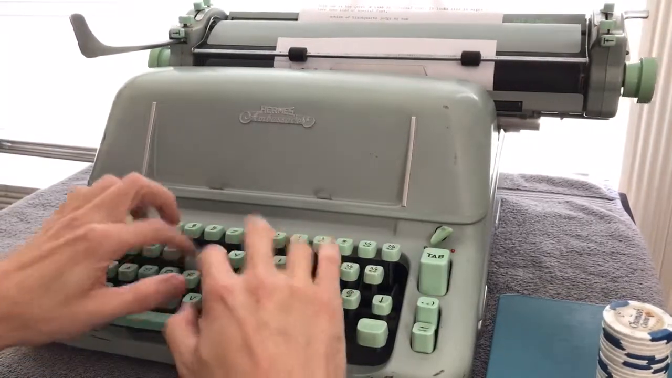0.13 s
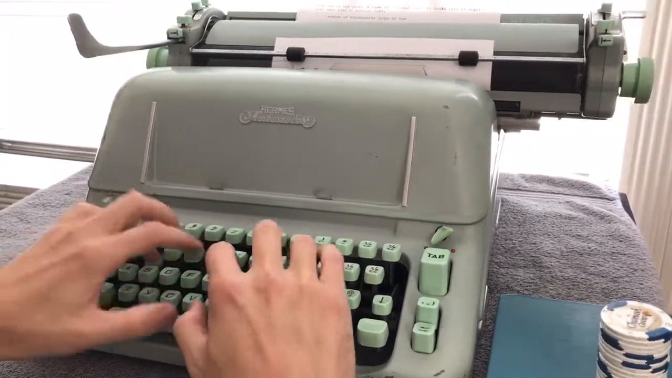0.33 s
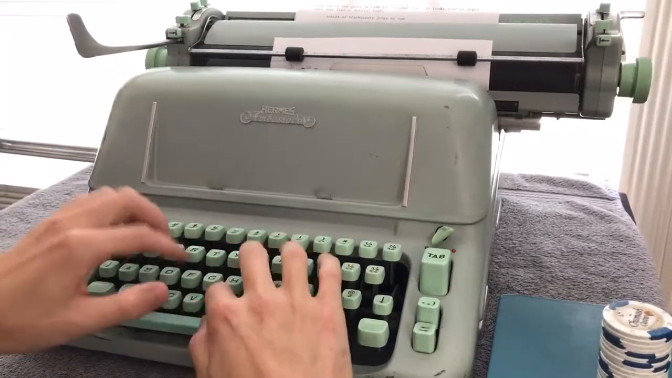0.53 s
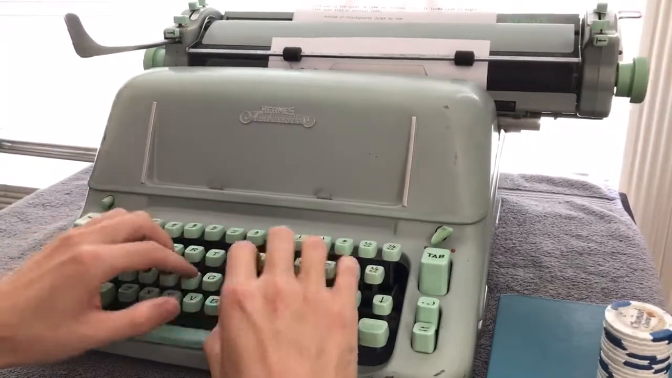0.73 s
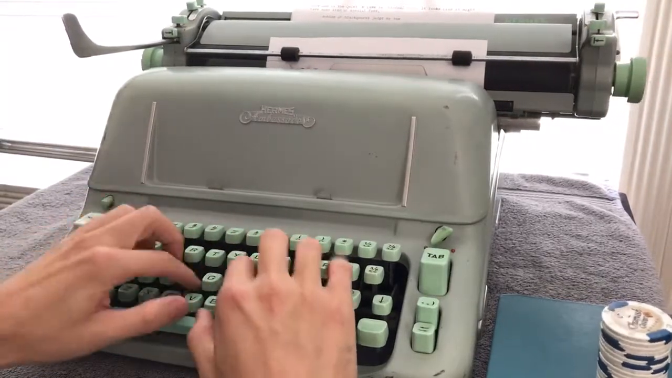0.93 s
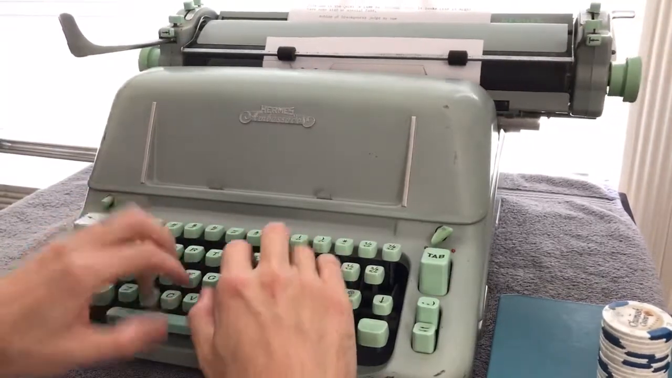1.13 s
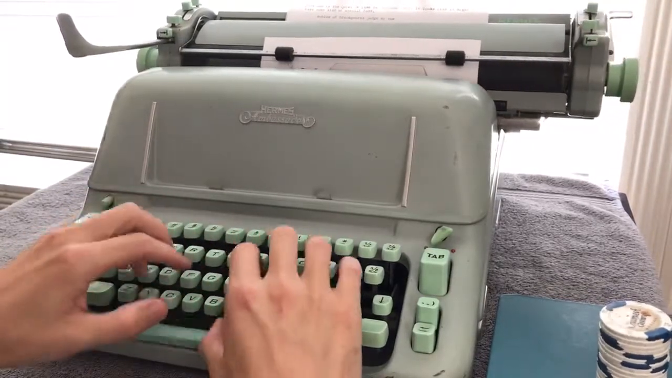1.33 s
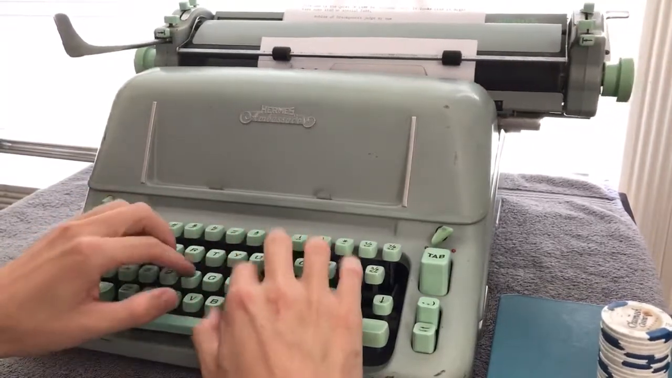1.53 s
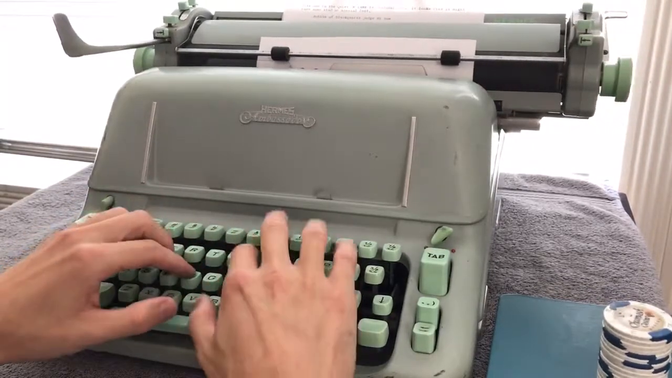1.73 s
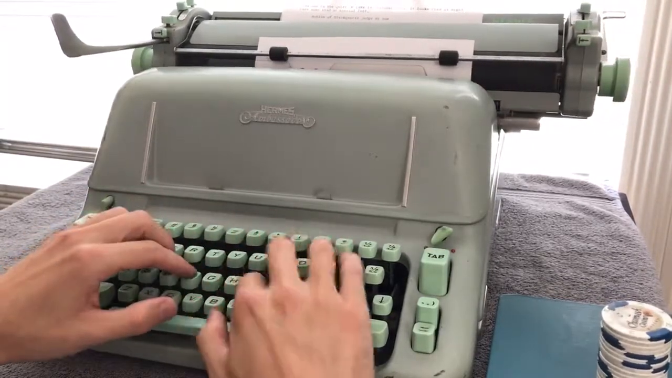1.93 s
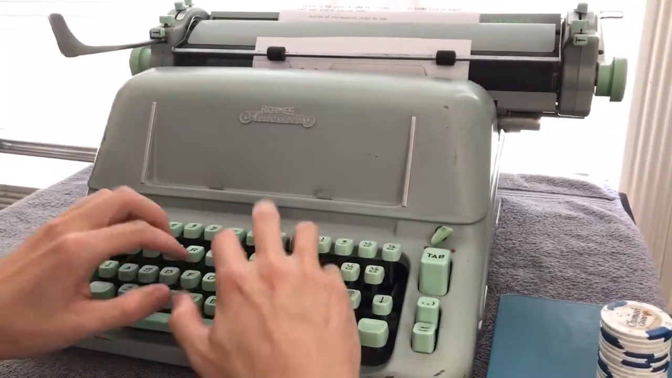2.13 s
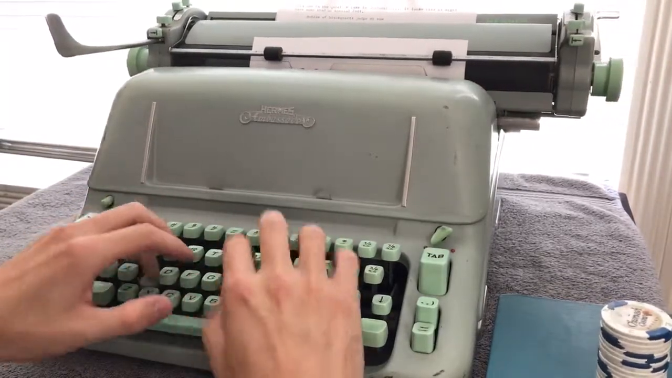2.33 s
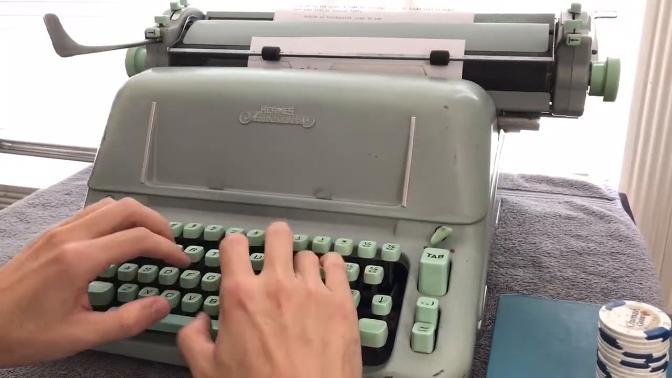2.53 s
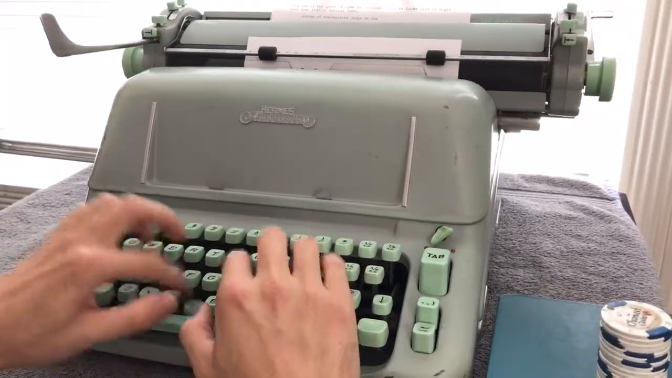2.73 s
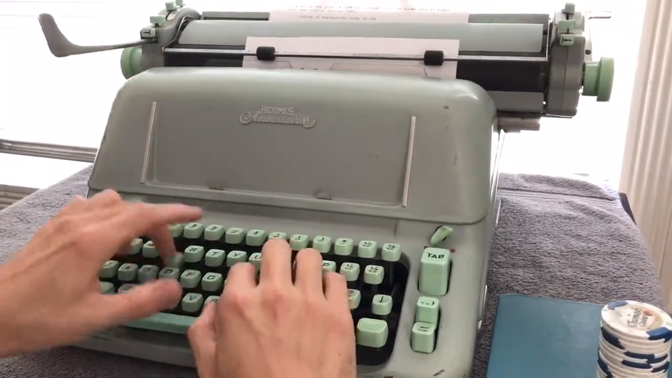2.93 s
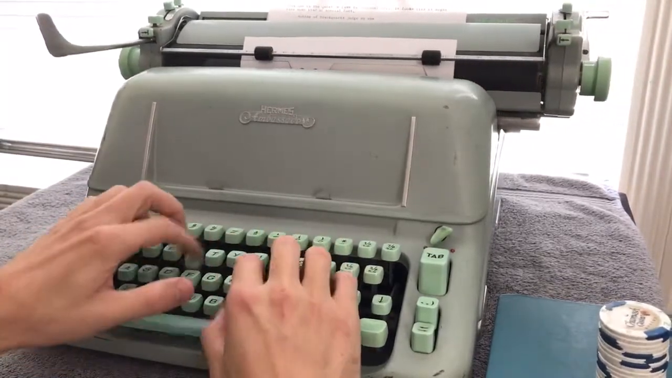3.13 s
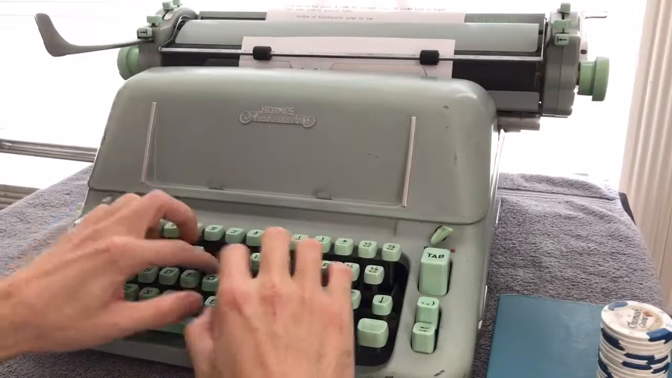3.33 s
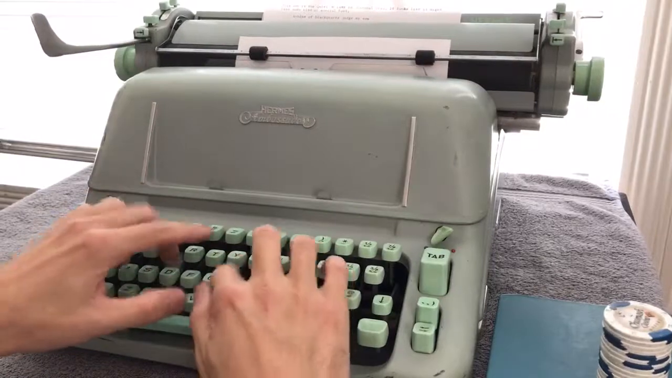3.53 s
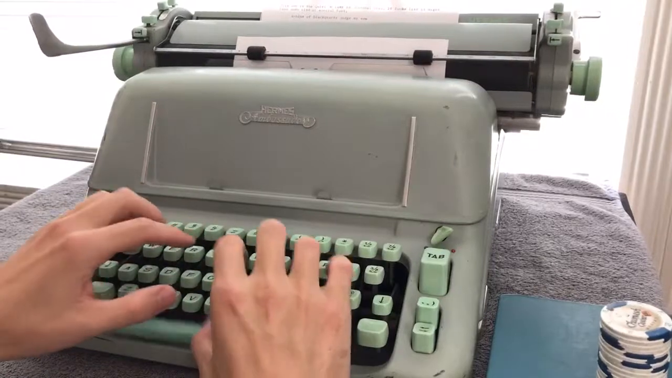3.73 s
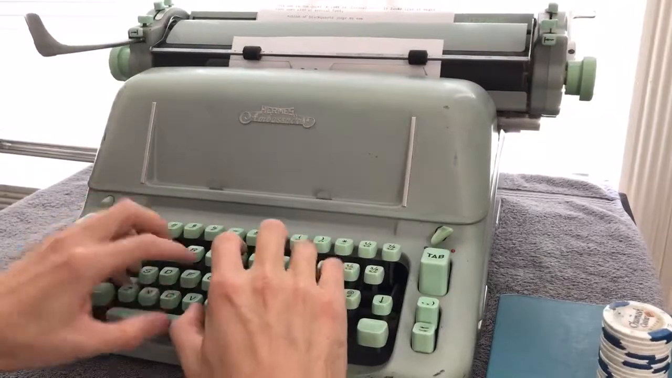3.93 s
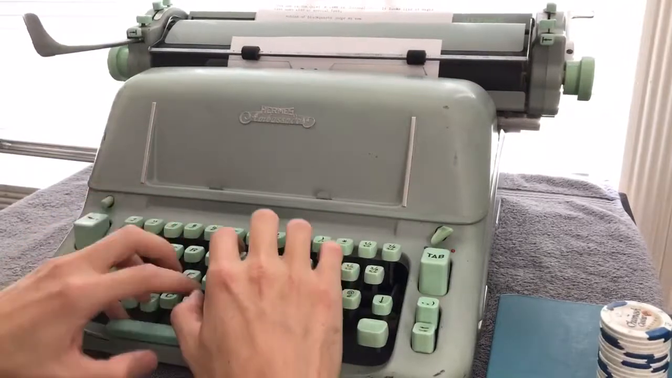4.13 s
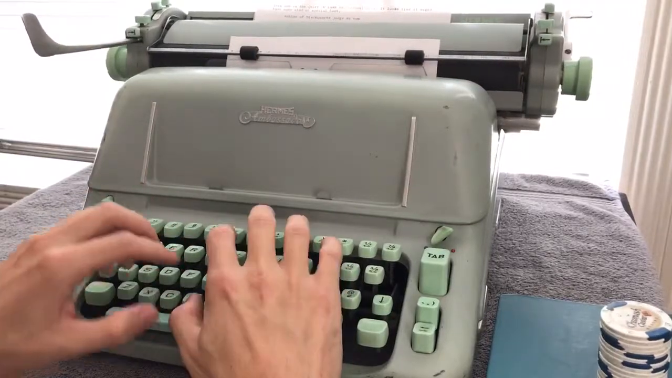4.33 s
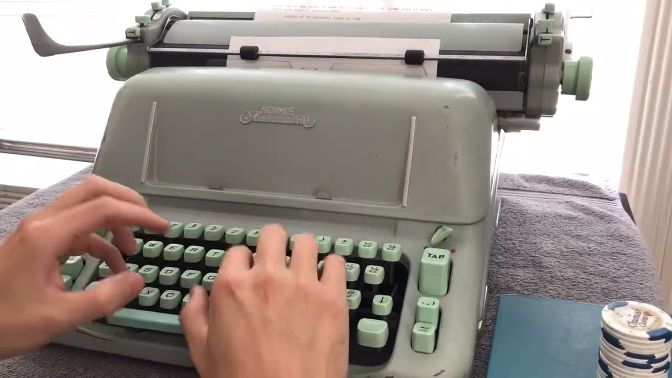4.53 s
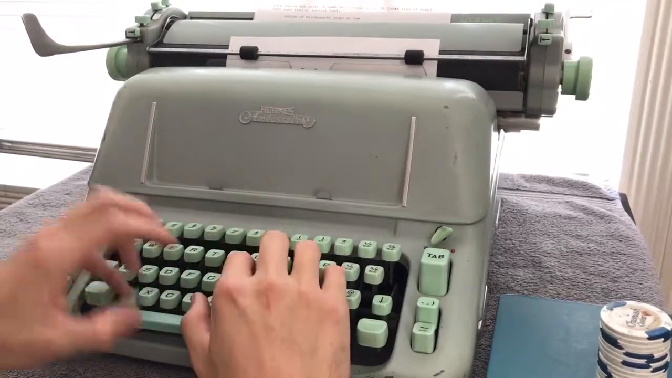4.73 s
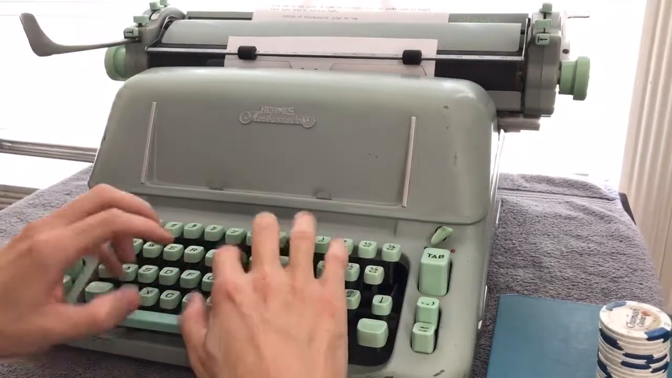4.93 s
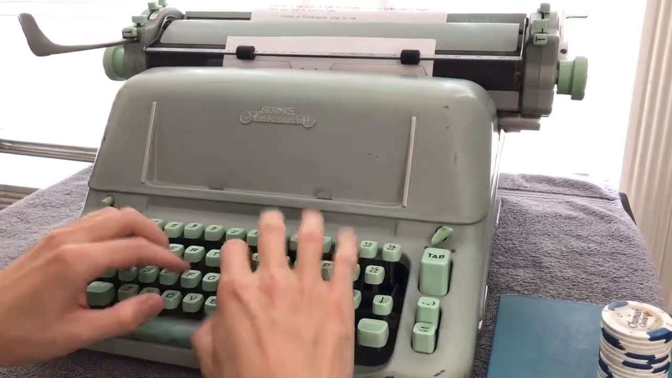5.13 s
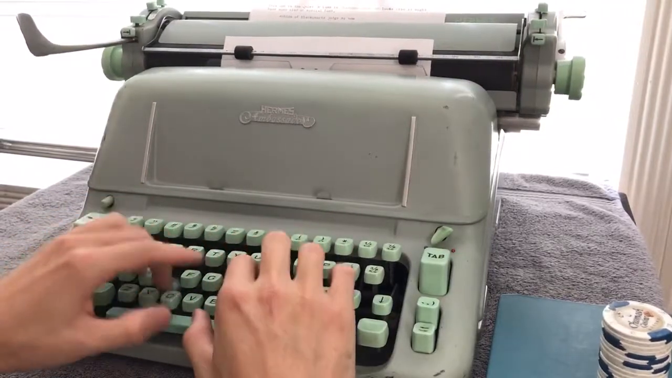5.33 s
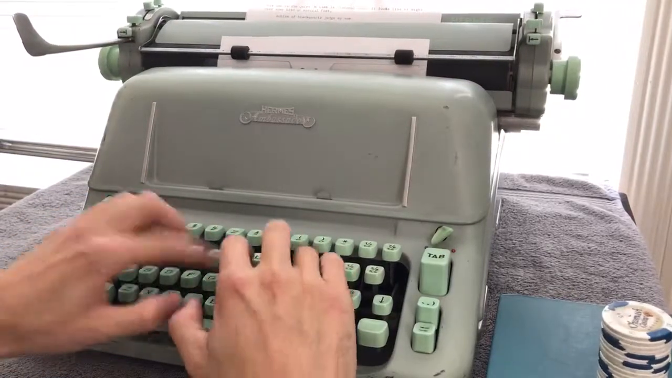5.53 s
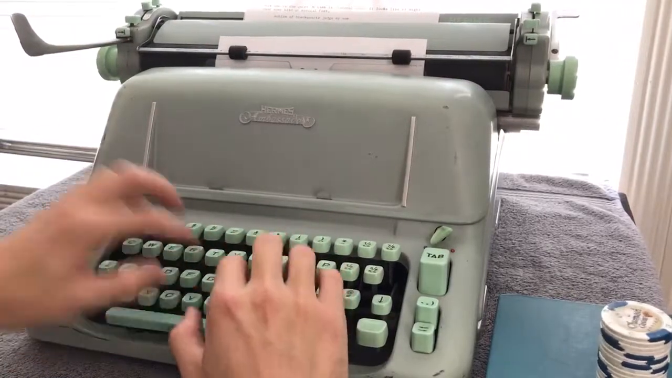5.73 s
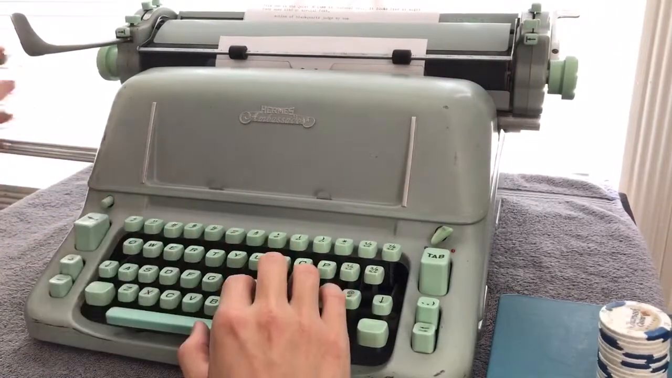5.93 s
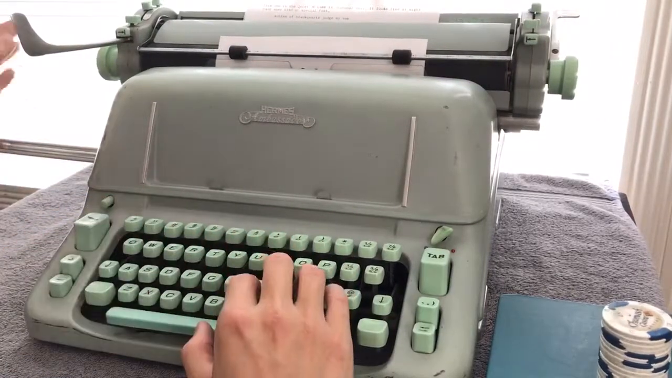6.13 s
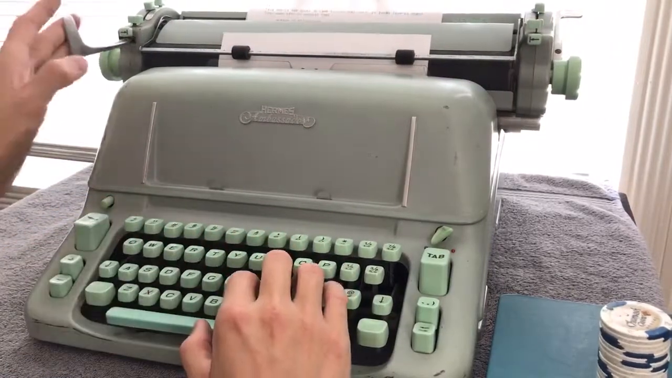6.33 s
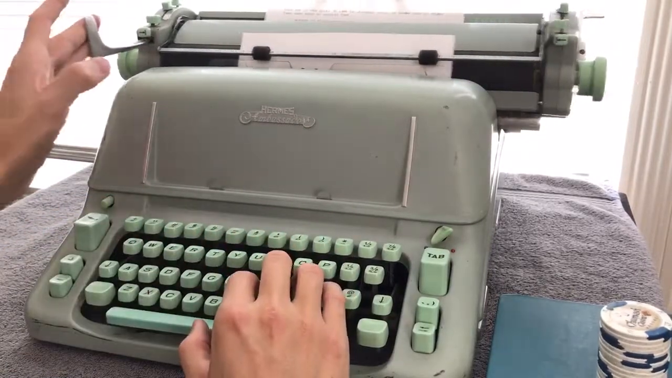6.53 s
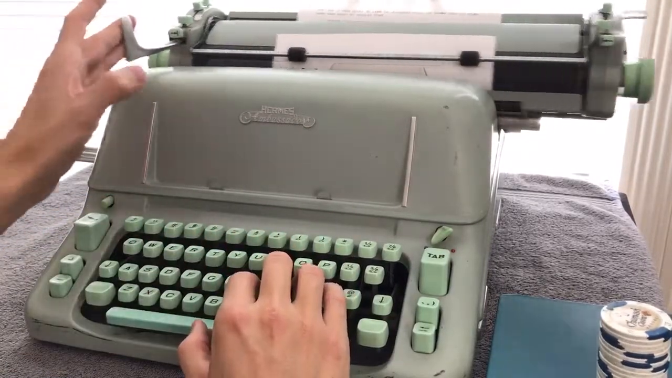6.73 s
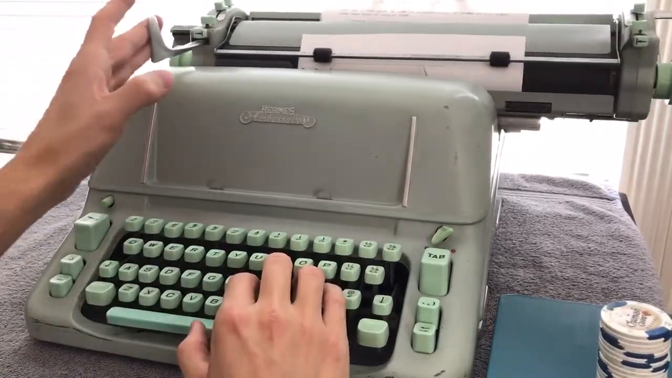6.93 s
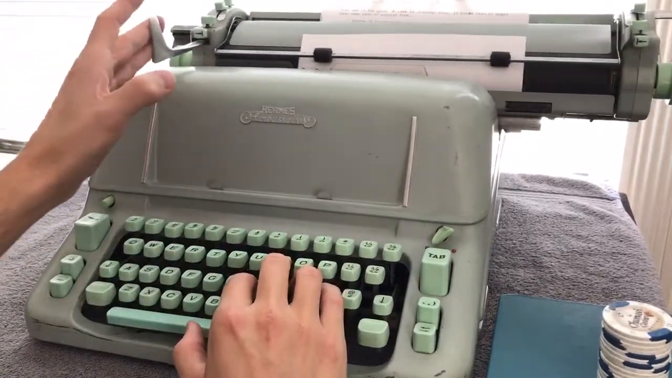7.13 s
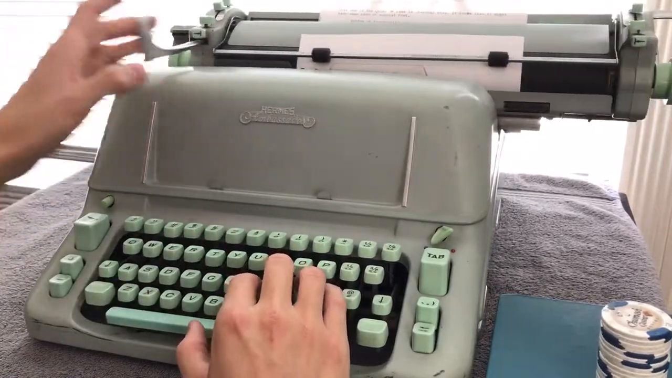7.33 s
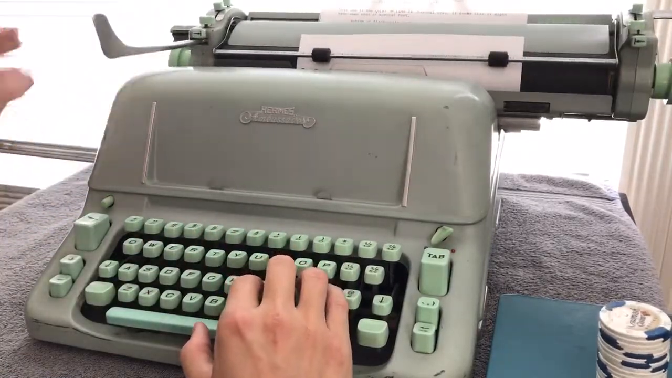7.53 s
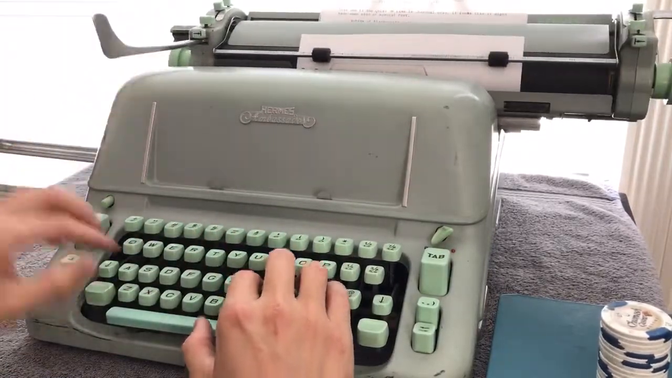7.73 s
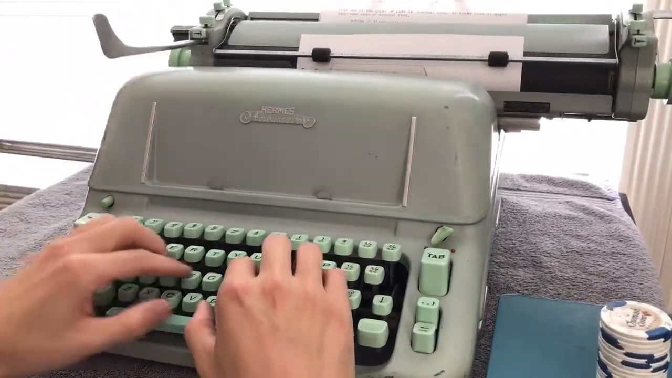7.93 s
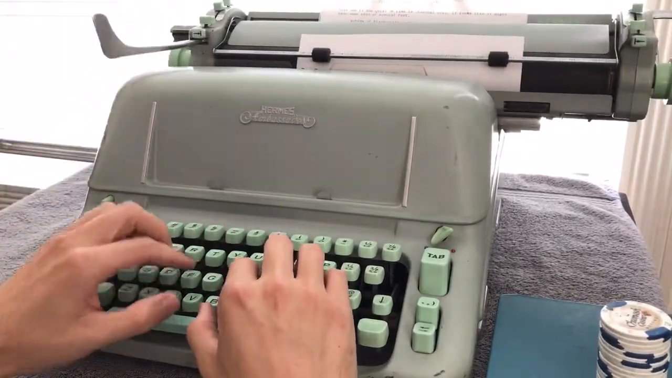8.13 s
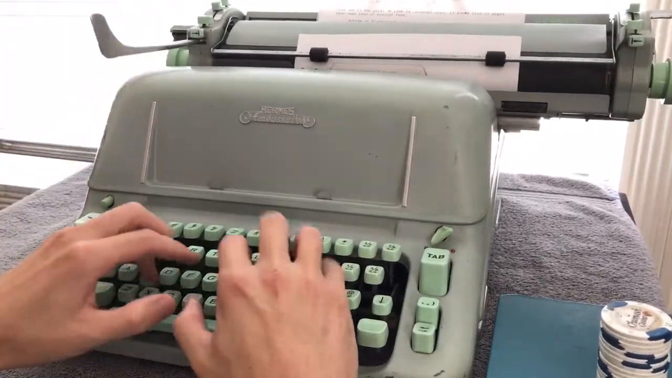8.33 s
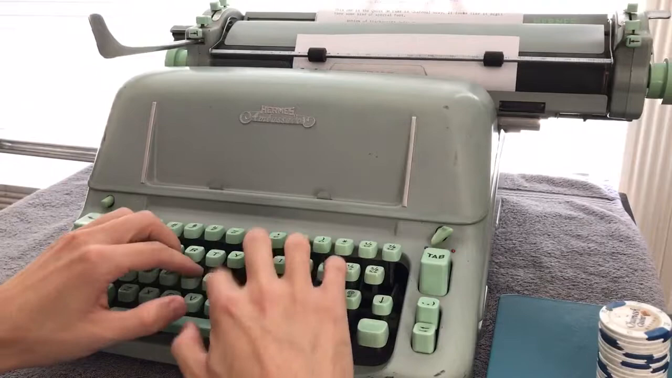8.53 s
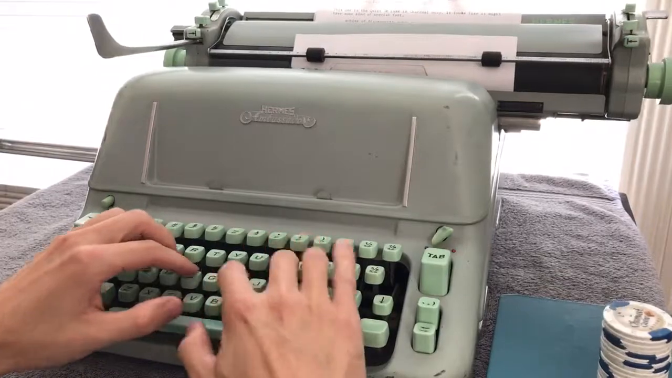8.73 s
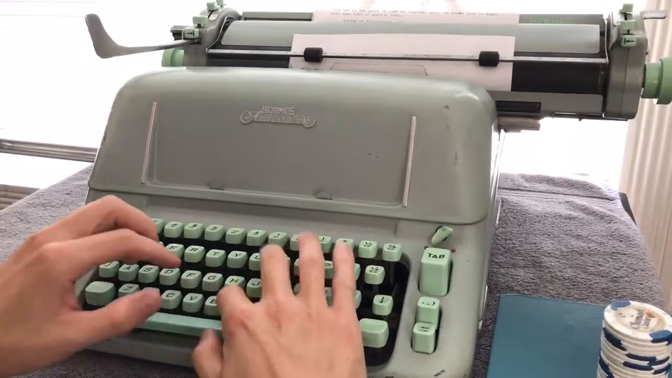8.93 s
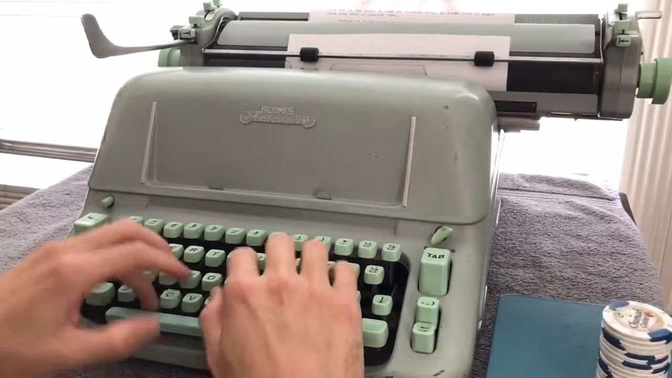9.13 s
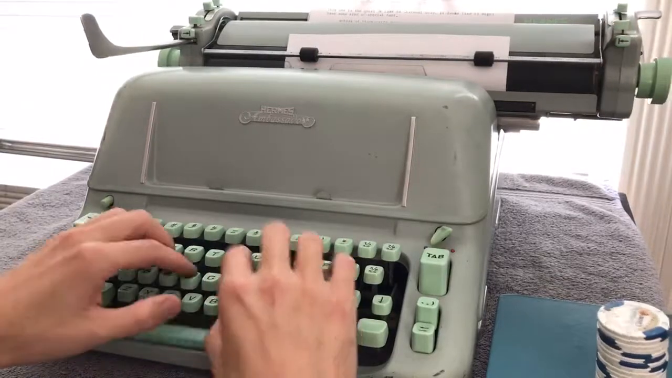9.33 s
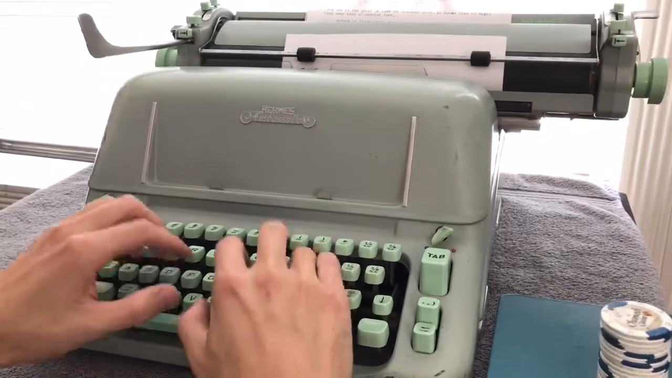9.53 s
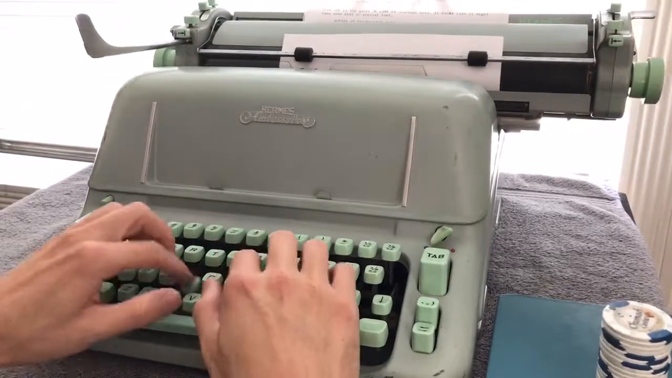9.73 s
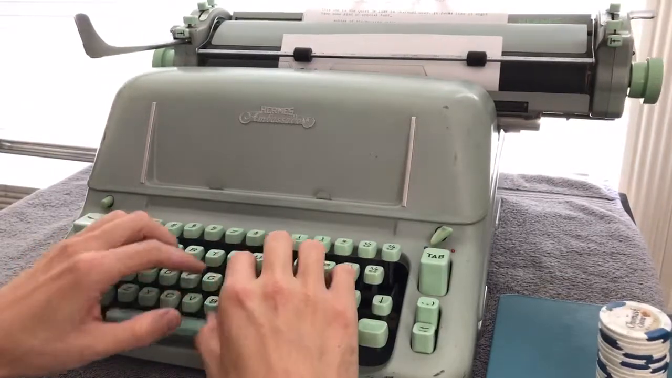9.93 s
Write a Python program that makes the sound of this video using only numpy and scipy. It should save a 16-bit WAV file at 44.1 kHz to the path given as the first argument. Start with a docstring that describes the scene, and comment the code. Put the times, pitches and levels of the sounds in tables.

```python
"""Manual typewriter in a small room

A heavy machine on a cloth-covered table, platen facing the microphone, over quiet air and a low hum.
The typing is quick: key levers rattle, typebars slap the platen and fall back, loose steel buzzes,
the space bar thumps the housing and the blows thud into the table. In a pause the carriage is
pushed back to the start of the line, then the typing goes on."""
import sys
import numpy as np
from scipy import signal
from scipy.fft import rfft, irfft
from scipy.io import wavfile

SR = 44100
rng = np.random.default_rng(int(sys.argv[2]) if len(sys.argv) > 2 else 0)


def bounce(signal):
    """Save signal as a 16-bit WAV file at the path given by the first command-line argument."""
    frames = np.transpose(np.atleast_2d(signal))
    limited = np.clip(frames, -1, 1)
    pcm = np.round(limited * 32767).astype(np.int16)
    wavfile.write(sys.argv[1], SR, pcm)


N = 440559
TIME = np.arange(N) / SR

# typebars hitting the platen: start_s, level_db, treble_db
STROKES = [(0.0003, -0.5, -3), (0.1231, -2.5, -1.5), (0.2702, -0.5, 1.5), (0.4317, -0.5, 5),
           (0.6178, -1.5, 0), (1.0194, -0.5, 5), (1.1464, -1, -1), (1.2729, 0, 2), (1.5819, -0.5, -2.5),
           (1.7945, 1, 3.5), (2.0094, 0.5, 1.5), (2.1854, 1.5, 1), (2.3354, -1.5, 5.5), (2.6196, 0.5, -4.5),
           (2.7331, 0.5, 4.5), (2.938, 0, 5), (3.1104, 0.5, 2), (3.4107, -1, 4), (3.5328, -1.5, 3.5),
           (3.642, -0.5, 4.5), (3.917, -1.5, 3), (4.002, 0.5, 4), (4.8665, -1, 4), (5.0665, 0, 5.5),
           (5.4365, 1, 3.5), (5.5554, 0.5, -9.5), (5.684, 0.5, 4.5), (8.3335, -1.5, 0),
           (8.4635, -1.5, -1.5), (8.639, -1.5, 1.5), (8.8142, -1, 2), (9.0129, 0, 3.5), (9.15, -1, 1.5),
           (9.5795, 1, -5), (9.7257, -1, 0.5)]
# presses of the space bar, and one (4.182 s) of the shift or backspace key:
# start_s, held_s, level_db, judder_s (after springing back)
PRESSES = [(0.8, .096, -3, 0.052), (1.416, .095, 0.5, .046), (2.465, 0.089, 0.5, .045),
           (3.261, 0.11, -2, 0.054), (3.761, .089, 0, 0.046), (4.182, .106, -2.5, 0.078),
           (5.238, .093, -0.5, .055), (9.389, .083, -0.5, .05), (9.944, .093, -5, .05)]
# return lever, line ratchet and margin stop: start_s, level_db, t60_s, hardness (0-1), pitch_hz
CLACKS = [(6.250, -14, 0.15, 0.7, 1800), (6.302, -3.5, 0.16, 0.6, 1650), (6.335, 3.5, 0.052, 0.9, 1750),
          (6.355, 0.5, 0.03, 1.0, 1800), (7.011, 0, 0.17, 0.83, 2800), (7.357, -14, 0.034, 0.86, 5600),
          (7.374, -10.5, 0.16, 0.14, 900), (7.427, -11.5, 0.057, 1.0, 2800), (7.44, -11, 0.14, 1.0, 2800),
          (7.487, 2, 0.15, 0.66, 420), (8.018, -27.5, .12, 0.6, 2800)]
# modes of a key lever: pitch_hz, t60_s, level_db
LEVER_MODES = [(325, 0.17, -58), (640, 0.11, -59), (812, 0.039, -50.5), (1151, 0.036, -59),
               (1310, .025, -59), (2320, 0.011, -61)]

# around each hit: the key is touched, the escapement trips, and afterwards the typebar falls back
TOUCH_LEAD_S, TRIP_LEAD_S, FALL_LAG_S = .052, .014, .124
RETURN_START_S, RETURN_STOP_S = 6.49, 7.115


def from_db(db):
    return 10 ** (np.asarray(db) / 20)


def at_hz(points, hz):
    """Read a table on a log-frequency axis."""
    points_hz, values = np.transpose(points)
    return np.interp(np.log(np.maximum(hz, 1)), np.log(points_hz), values)


def colour(x, spectrum, size=4096):
    """Causal (minimum-phase) filter with the given spectrum."""
    gain = from_db(at_hz(spectrum, np.fft.rfftfreq(size, 1 / SR)))
    cepstrum = irfft(np.log(gain))
    cepstrum[1:size // 2] *= 2
    cepstrum[size // 2 + 1:] = 0
    return signal.oaconvolve(x, irfft(np.exp(rfft(cepstrum))))[:len(x)]


def add(out, start_s, sound):
    """Mix a sound in at start_s."""
    start = int(np.clip(round(start_s * SR), 0, len(out)))
    out[start:start + len(sound)] += sound[:len(out) - start]


def decay(t, t60):
    """Exponential fade that begins at t = 0."""
    return (t >= 0) * np.exp(-np.log(1000) * np.maximum(t, 0) / t60)


def ring(x, modes):
    """Resonators (pitch_hz, t60_s, level_db) driven by x."""
    out = 0
    for hz, t60, db in modes:
        radius, angle = decay(1 / SR, t60), 2 * np.pi * hz / SR
        poles = [1, -2 * radius * np.cos(angle), radius * radius]
        out = out + from_db(db) * signal.lfilter([0, np.sin(angle)], poles, x + 1e-18)
    return out


def chatter(per_s, spread_db):
    """Tiny contacts of uneven force at random moments; rms 1."""
    clicks = (rng.random(N) < per_s / SR) * rng.choice([-1, 1], N)
    clicks = clicks * from_db(spread_db * np.clip(rng.standard_normal(N), -2, 2))
    return clicks / np.sqrt(np.mean(clicks ** 2))


def shaking(blows):
    """Envelope of blows (start_s, level_db, hold_s, t60_s); their powers add."""
    power, t = np.zeros(N), TIME[:SR // 2]
    for s, db, hold, t60 in blows:
        add(power, s, (from_db(db) * decay(np.maximum(t - hold, 0), t60)) ** 2)
    return np.sqrt(power)


def each_stroke(lag_s, spread_s, level_db, vary_db=3.5):
    """One small contact (start_s, level_db) for each stroke, never quite alike in time and force."""
    chance = np.clip(rng.standard_normal((len(STROKES), 2)), -2, 2)
    return [(s + lag_s + spread_s * late, level_db + vary_db * force)
            for (s, _, _), (late, force) in zip(STROKES, chance)]


def press_blows():
    """Each press goes down softly and springs back harder: start_s, level_db, judder_s, shudder_db."""
    downs = [(s, db - 5.5, .02, db - 11) for s, _, db, _ in PRESSES]
    ups = [(s + held_s, db, judder_s, db) for s, held_s, db, judder_s in PRESSES]
    return downs + ups


def room_tone(hum_hz=57.0, hum_db=-61.0):
    """Quiet air and a faint low hum."""
    # spectrum of the air: frequency_hz, level_db
    air_spectrum = [(22, -71.5), (36, -57.5), (46, -43.5), (58, -40.5), (80, -44.5), (115, -43.5),
                    (170, -47.5), (240, -44.5), (550, -53.5), (1000, -59.5), (3000, -66), (6000, -71.5),
                    (16000, -73.5)]
    hum = from_db(hum_db) * np.sin(2 * np.pi * hum_hz * TIME)
    return colour(rng.standard_normal(N), air_spectrum) + hum


def room_echo(x, build_s=.0064):
    """The small room answers with a diffuse tail whose treble dies first."""
    # colour of the tail: frequency_hz, level_db
    tail_spectrum = [(50, -4.5), (300, -6), (1000, -8), (2400, -4.5), (4000, -8), (6000, -8), (9500, -11),
                     (16000, -6)]
    # decay of the room: frequency_hz, t60_s
    decay_times = [(200, 0.47), (1500, 0.49), (5000, 0.41), (9000, 0.43), (15000, 0.28)]
    t, tail = TIME[:SR * 3 // 4], 0
    edges_hz = np.geomspace(40, 20000, 13)
    white, hz = rfft(rng.standard_normal(len(t))), np.fft.rfftfreq(len(t), 1 / SR)
    for low, high in zip(edges_hz, edges_hz[1:]):
        band = irfft(white * (hz >= low) * (hz < high), len(t))
        fade = decay(t, at_hz(decay_times, np.sqrt(low * high))) * (1 - np.exp(-t / build_s))
        tail = tail + band * fade / np.linalg.norm(fade)
    return signal.fftconvolve(x, colour(tail, tail_spectrum))[:N]


def faint_ticks():
    """Small dry ticks in the pauses of the typing."""
    # the ticks: start_s, level_db
    ticks = [(4.519, -3), (6.002, 2.5), (6.066, -6), (7.149, 0.5), (7.3, -6), (7.738, -2.5)]
    # their spectrum: frequency_hz, level_db
    tick_spectrum = [(500, -61.5), (1800, -46.5), (2800, -34), (4200, -45.5), (8000, -58), (16000, -69.5)]
    envelope = shaking([(s, db, .001, .014) for s, db in ticks])
    return colour(envelope * chatter(12000, 1.96), tick_spectrum)


def table_thuds(thud_t60=.43, rock_t60=.5, hard_loss_db=18.0):
    """Blows pass through the feet into the table, dull clacks more than hard ones; typing rocks it."""
    # spectrum of a thud: frequency_hz, level_db
    thud_spectrum = [(25, -54.5), (55, -23), (80, -41), (125, -23.5), (165, -36), (205, -21.5), (260, -25),
                     (390, -23), (520, -31), (800, -31.5), (1500, -32), (5000, -54.5)]
    # the table rocking under the machine: pitch_hz, t60_s, level_db
    rocking_modes = [(46, 0.21, -85), (56, 0.26, -82)]
    blows = [(s, .5) for s, _, _ in STROKES]
    blows += [(s, db - .5 - hard_loss_db * hard) for s, db, _, hard, _ in CLACKS]
    force = shaking([(s, db, .012, thud_t60) for s, db in blows]) * chatter(5000, 1.4)
    rocking = shaking([(s, 0, .012, rock_t60) for s, *_ in STROKES + press_blows()])
    return colour(force, thud_spectrum) + ring(rocking * rng.standard_normal(N), rocking_modes)


def springs(blows):
    """Springs in the machine ring on thinly after each blow."""
    # their modes: pitch_hz, t60_s, level_db
    spring_modes = [(5335, .4, -76), (9055, .7, -78), (12965, .7, -73)]
    return ring(blows, spring_modes)


def steel_snaps(falls, snap_t60=.018, fall_db=-7.5):
    """Hard steel snaps into place: the escapement just before each blow, the typebar as it lands."""
    # single bright steel clicks (typebars falling back, a key touched, the shift): start_s, level_db
    bright_clicks = [(3.251, -4), (3.784, -5.5), (4.288, 5), (4.81, -8.5), (5.808, -9), (8.022, -17.5)]
    # spectrum of a snap: frequency_hz, level_db
    snap_spectrum = [(200, -55), (1000, -26), (6000, -31.5), (10000, -34.5), (13000, -30.5), (16000, -28.5)]
    trips = each_stroke(-TRIP_LEAD_S, spread_s=.001, level_db=-12.0)
    snaps = trips + [(s, fall_db + db) for s, db in falls] + bright_clicks
    envelope = shaking([(s, db, .001, snap_t60) for s, db in snaps])
    return colour(envelope * chatter(18000, 3.3), snap_spectrum)


def key_levers(falls, knock_db=-11.0):
    """The linkage rattles at key touch, trip and fall; the typebar knocks on its rest."""
    # spectrum of the linkage: frequency_hz, level_db
    linkage_spectrum = [(40, -52), (140, -30), (330, -37.5), (560, -43), (800, -37.5), (1300, -41.5),
                        (2200, -42.5), (6000, -49), (11000, -55.5), (14500, -45.5), (16000, -54.5)]
    # touch, trip and fall: lag_s, level_db, hold_s, t60_s
    stages = [(-TOUCH_LEAD_S, 1.5, .015, .15), (-TRIP_LEAD_S, 7.5, .012, .04),
              (FALL_LAG_S, -2.5, .02, .17)]
    rattle = shaking([(s + lag, db, hold, t60) for s, _, _ in STROKES for lag, db, hold, t60 in stages])
    knocks = shaking([(s, knock_db + db, .003, .03) for s, db in falls])
    linkage = colour(rattle * chatter(2000, 4.0), linkage_spectrum)
    return linkage + ring(knocks * chatter(5000, 1.7), LEVER_MODES)


def carriage_push(attack_s=.045, release_s=.03, ends_db=-7.0, swell_db=9.5, uneven_db=3.4):
    """Strength of the rolling: one uneven sweep, fastest halfway, that ends at the margin stop."""
    elapsed_s = TIME - RETURN_START_S
    progress = np.clip(elapsed_s / (RETURN_STOP_S - RETURN_START_S), 0, 1)
    moving = np.clip(elapsed_s / attack_s, 0, 1) * np.clip(1 - (TIME - RETURN_STOP_S) / release_s, 0, 1)
    bumps = np.interp(TIME, np.linspace(0, TIME[-1], 300), rng.standard_normal(300))
    return moving * from_db(ends_db + swell_db * np.sin(np.pi * progress) + uneven_db * bumps)


def struck_parts(part_db=-39.0, band_ratio=1.25):
    """Each clack rings briefly in the part that it strikes."""
    out, t = np.zeros(N), TIME[:SR // 2]
    for s, db, t60, _, hz in CLACKS:
        band = signal.butter(1, [hz / band_ratio, hz * band_ratio], "band", fs=SR)
        ringing = signal.lfilter(*band, rng.standard_normal(len(t)))
        add(out, s, from_db(part_db + db) * decay(t, t60) * ringing / ringing.std())
    return out


def carriage_spring(pluck_db=46.0):
    """The clacks pluck a thin spring, the more the harder and longer they are."""
    # its one mode: pitch_hz, t60_s, level_db
    spring_mode = [(9055, .45, -76)]
    plucks = np.zeros(N)
    for s, db, t60, hard, _ in CLACKS:
        add(plucks, s, [from_db(pluck_db + db) * hard ** 2 * t60])
    return ring(plucks, spring_mode)


def carriage_return(clack_db=-.5, soft_hz=2200, pawl_db=-40.0, pawl_per_s=110):
    """The lever feeds a line; the carriage rolls to its stop, pawl ticking over the rack, and settles."""
    # spectrum of a clack: frequency_hz, level_db
    clack_spectrum = [(40, -46), (150, -25.5), (480, -31), (620, -23), (900, -26), (1300, -23.5),
                      (2100, -24), (4000, -24.5), (8000, -29), (12000, -31.5), (16000, -32.5)]
    # spectrum of rolling on the rail: frequency_hz, level_db
    rail_spectrum = [(60, -40.5), (270, -47.5), (395, -36), (480, -45), (620, -40.5), (900, -49),
                     (2000, -55.5), (3200, -53), (8000, -60.5), (16000, -61)]
    # modes of the carriage: pitch_hz, t60_s, level_db
    carriage_modes = [(165, 0.093, -69.5), (321, 0.21, -70), (669, 0.051, -69), (867, 0.026, -67.5),
                      (1205, 0.05, -77.5), (1405, 0.034, -62), (1680, 0.023, -70), (1920, 0.019, -68),
                      (2480, 0.048, -89), (2900, 0.032, -65.5), (3340, 0.025, -64.5), (4400, .03, -74)]
    contacts = chatter(8000, 2.9)
    whole = contacts * shaking([(s, db, .002, t60) for s, db, t60, _, _ in CLACKS])
    sharp = contacts * shaking([(s, db + 20 * np.log10(hard), .002, t60)
                                for s, db, t60, hard, _ in CLACKS])
    # soft contacts pass on only the lows
    force = sharp + signal.lfilter(*signal.butter(1, soft_hz, fs=SR), whole - sharp)
    clacks = from_db(clack_db) * colour(force, clack_spectrum) + ring(force, carriage_modes)
    push = carriage_push()
    rolling = colour(push * chatter(2500, 2.8), rail_spectrum)
    pawl = from_db(pawl_db) * colour(push * chatter(pawl_per_s, 2.7), clack_spectrum)
    return clacks + struck_parts() + carriage_spring() + rolling + pawl


def housing_shudder(level_db=3.0, swell_s=.0087, t60=.13):
    """Each press shakes the heavy panels, which take a moment to get going."""
    # bar and panels vibrating together: pitch_hz, level_db
    panel_modes = [(126, -48.5), (256, -40.5), (316, -35), (392, -40.5), (1050, -49.5), (1205, -52)]
    out, t = np.zeros(N), TIME[:SR // 2]
    tones = sum(from_db(db) * np.sin(2 * np.pi * hz * t) for hz, db in panel_modes)
    panels = (1 - np.exp(-t / swell_s)) * tones
    for s, _, hold, shudder_db in press_blows():
        add(out, s, from_db(level_db + shudder_db) * panels * decay(np.maximum(t - hold, 0), t60))
    return out


def space_bar(judder_t60=.051, lever_db=-12.5):
    """The long bar (once the shift or backspace key) judders against its stops and knocks its lever."""
    # spectrum of the bar: frequency_hz, level_db
    bar_spectrum = [(40, -45), (130, -24), (180, -24), (240, -13.5), (340, -18), (400, -23), (510, -33),
                    (720, -21.5), (890, -27.5), (1100, -27), (1800, -34.5), (3700, -37), (6000, -44),
                    (16000, -47)]
    blows = press_blows()
    judder = shaking([(s, db, hold, judder_t60) for s, db, hold, _ in blows]) * chatter(2500, 6.1)
    knocks = shaking([(s, lever_db, .008, .04) for s, *_ in blows]) * chatter(5000, 2.0)
    return colour(judder, bar_spectrum) + ring(knocks, LEVER_MODES)


def frame_rattle():
    """Each stroke sets loose parts buzzing; the clatter comes back off two near surfaces and dies away."""
    # loose steel in the frame: frequency_hz, level_db
    frame_spectrum = [(200, -37), (500, -26.5), (1000, -30), (1300, -26), (2300, -24.5), (3500, -23.5),
                      (4600, -23), (5300, -21.5), (6600, -20), (7600, -23.5), (9600, -22.5), (12000, -32),
                      (16000, -38)]
    # buzz, two reflections and tail: lag_s, level_db, t60_s
    arrivals = [(.002, 0.0, .16), (.0086, 5.0, .025), (.0265, -6.5, .025), (.006, -5.0, .28)]
    envelope = shaking([(s + lag, stroke_db + db, 0, t60)
                        for s, stroke_db, _ in STROKES for lag, db, t60 in arrivals])
    return colour(envelope * chatter(20000, 2.8), frame_spectrum)


def carriage_place(now_s, first_place=.06, step=.027):
    """Place on the line (0 start, 1 end): the carriage moves one step for each stroke or press."""
    line_start_s, start_place = (RETURN_STOP_S, 0) if now_s > RETURN_STOP_S else (0, first_place)
    typed = sum(line_start_s <= s < now_s for s, *_ in STROKES + PRESSES)
    return np.clip(start_place + step * typed, 0, 1)


def typebars(slap_t60=.011, bounce_s=.0026, bounce_db=-4.5, bounce_t60=.018, treble_hz=9000):
    """Each slug hits, bounces once and rings the platen, whose tone shifts as the carriage moves."""
    # modes of platen and type guide: pitch_hz, t60_s, line_start_db, line_end_db
    platen_modes = [(1226, 0.036, -24.5, -24), (1496, 0.019, -29, -22.5), (1674, 0.013, -29.5, -25.5),
                    (2268, 0.036, -43, -33), (2622, 0.044, -26.5, -34), (3084, 0.0099, -12.5, -17),
                    (3490, 0.016, -20.5, -16), (3744, 0.02, -12.5, -19.5), (4250, 0.013, -5.5, -18),
                    (4433, 0.025, -15.5, -23.5), (4670, 0.029, -42, -18.5), (5220, 0.032, -28, -13.5),
                    (5384, 0.021, -13, -18), (5860, 0.028, -35.5, -30.5), (6010, 0.072, -31.5, -31),
                    (6100, 0.029, -22.5, -25), (7340, .02, -20.5, -38.5), (7410, 0.014, -19.5, -41.5),
                    (8550, 0.016, -29, -21), (8720, 0.027, -29.5, -20.5), (9270, 0.047, -43.5, -20.5),
                    (11570, .012, -24, -29)]
    # spectrum of the slap: frequency_hz, level_db
    slap_spectrum = [(100, -43), (350, -23.5), (600, -29.5), (850, -11.5), (1020, -28.5), (1300, -6.5),
                     (2300, -16.5), (4200, -4.5), (6400, -6.5), (7600, -13), (9600, -7.5), (13000, -11.5),
                     (16000, -17.5)]
    own_share, vary_db = .3, 1.2
    out, t = np.zeros(N), TIME[:SR // 16]
    hz, t60, start_db, end_db = np.transpose(platen_modes)
    signs = (-1) ** np.arange(len(hz))
    modes = signs[:, None] * np.sin(2 * np.pi * hz[:, None] * t) * decay(t, t60[:, None])
    envelope = np.hypot(decay(t, slap_t60), from_db(bounce_db) * decay(t - bounce_s, bounce_t60))
    # countless dense modes, as noise: one pattern at each end of the line, and each stroke's own
    at_start, at_end = rng.standard_normal((2, len(t)))
    highpass = signal.butter(1, treble_hz, "high", fs=SR)
    for s, level_db, treble_db in STROKES:
        place = carriage_place(s)
        shared = np.sqrt(1 - place) * at_start + np.sqrt(place) * at_end
        dense = np.sqrt(1 - own_share) * shared + np.sqrt(own_share) * rng.standard_normal(len(t))
        modes_db = start_db + place * (end_db - start_db) + vary_db * rng.standard_normal(len(hz))
        hit = from_db(modes_db) @ modes + colour(dense * envelope, slap_spectrum)
        treble_shelf = (from_db(treble_db) - 1) * signal.lfilter(*highpass, hit)
        add(out, s, from_db(level_db) * (hit + treble_shelf))
    return out


def scene(platen_room_db=-6.0, frame_room_db=1.0):
    """The machine in its room, heard from one microphone."""
    slaps, frame = typebars(), frame_rattle()
    falls = each_stroke(FALL_LAG_S, spread_s=.01, level_db=0)
    works = steel_snaps(falls) + carriage_return() + space_bar() + key_levers(falls)
    works += springs(slaps + frame) + table_thuds() + faint_ticks()
    # the platen faces the microphone, while the frame radiates all round
    echo = room_echo(works + from_db(platen_room_db) * slaps + from_db(frame_room_db) * frame)
    return (slaps + frame + works + housing_shudder() + echo + room_tone())[None]


def record(dry, low_cut_hz=40, ceiling=.63, high_cut_hz=15900):
    """The microphone drops the deepest bass, the sharpest peaks are rounded and the top is cut."""
    thinned = signal.sosfilt(signal.butter(6, low_cut_hz, "high", fs=SR, output="sos"), dry)
    rounded = ceiling * np.tanh(thinned / ceiling)
    return signal.sosfilt(signal.ellip(10, .2, 75, high_cut_hz, fs=SR, output="sos"), rounded)


dry = scene()
out = record(dry)
bounce(out)
```